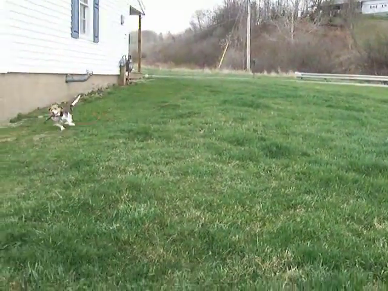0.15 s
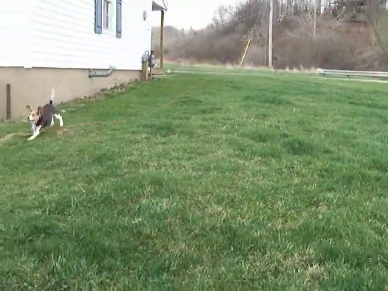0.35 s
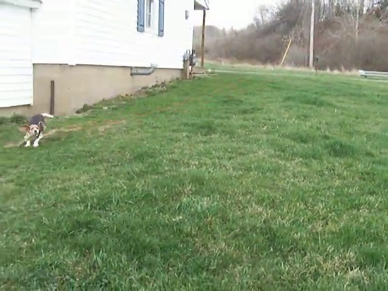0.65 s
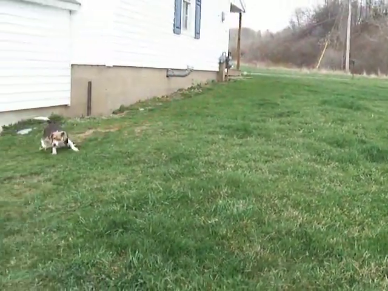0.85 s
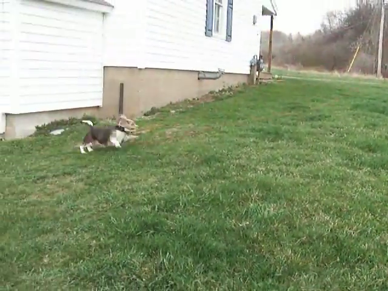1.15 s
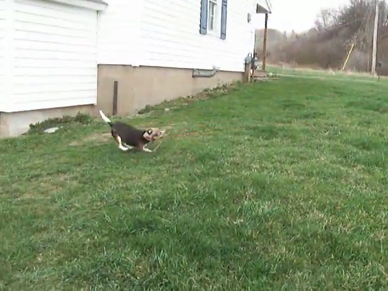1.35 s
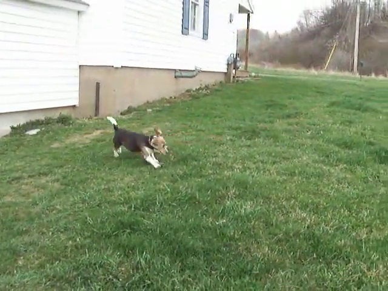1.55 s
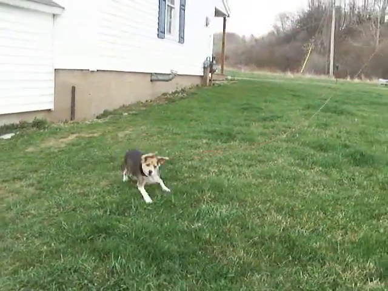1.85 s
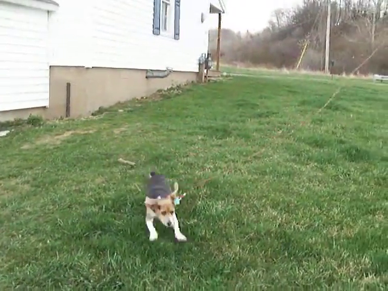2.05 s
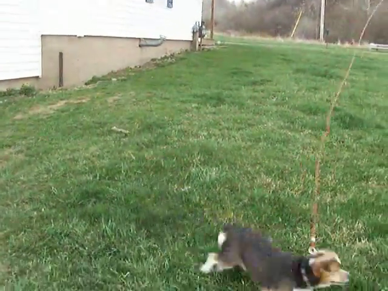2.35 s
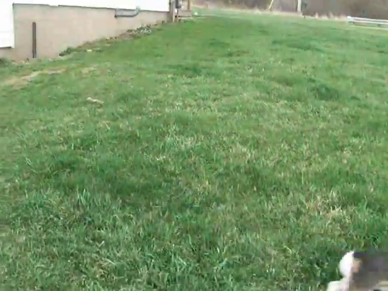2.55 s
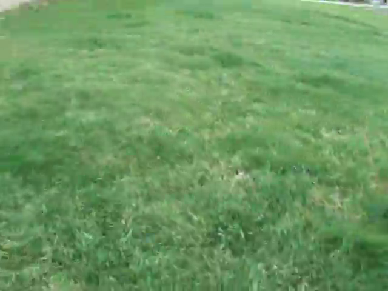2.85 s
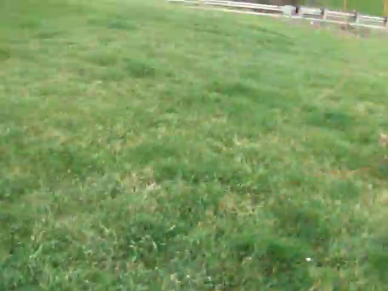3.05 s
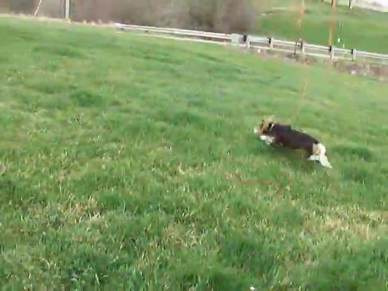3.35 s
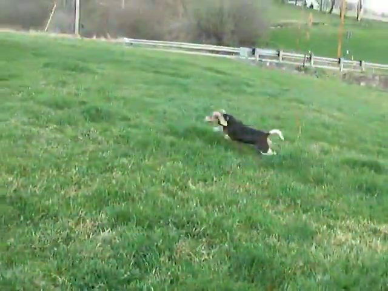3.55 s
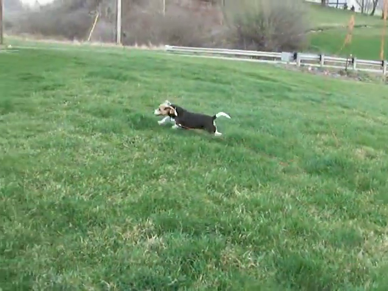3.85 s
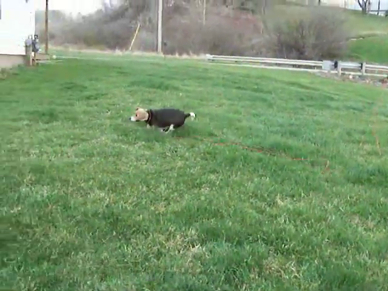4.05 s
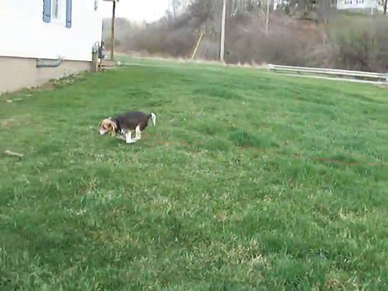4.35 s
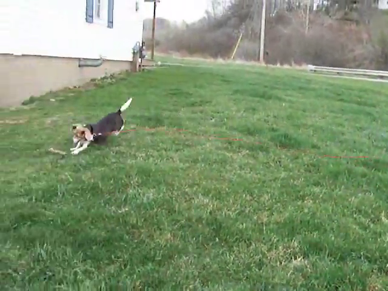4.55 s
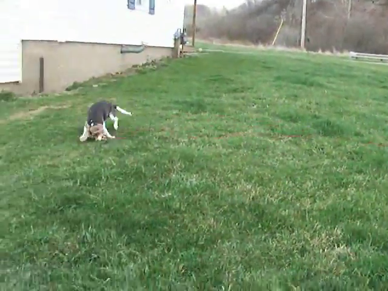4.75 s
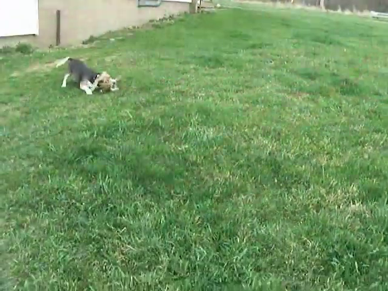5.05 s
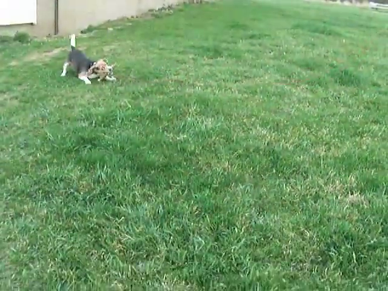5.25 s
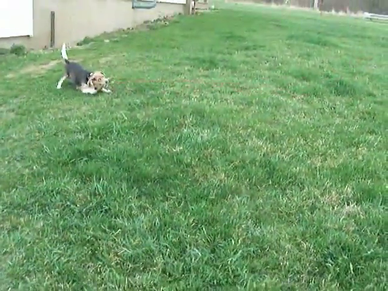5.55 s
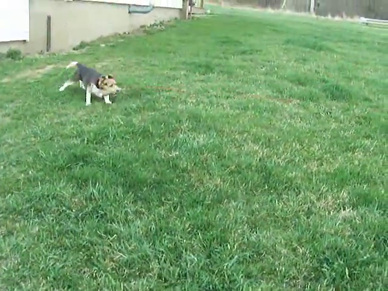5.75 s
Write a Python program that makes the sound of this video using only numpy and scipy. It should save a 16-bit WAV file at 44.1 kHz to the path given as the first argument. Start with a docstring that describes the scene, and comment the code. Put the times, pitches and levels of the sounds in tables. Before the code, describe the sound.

A small dog gallops over a lawn, collar tags jingling and a long tether hissing through grass, with wind thumps and steady hiss behind.

```python
"""Small dog galloping on a long tether

A small dog gallops over a lawn and comes close: paws swish as blades of grass flick at random,
and the dragged line hisses and chatters. Collar tags and a hook ring, links click, the line knocks,
metal squeaks and a short scuff rasps. Wind buffets one port of a hand-held camera whose zoom motor
runs briefly; behind lie a noise hiss (far road, some rustle of the dog) and a bird's gliding notes."""
import sys
import numpy as np
from scipy import signal
from scipy.fft import rfft, irfft
from scipy.io import wavfile

SR = 44100
rng = np.random.default_rng(int(sys.argv[2]) if len(sys.argv) > 2 else 0)


def to_wav(sig):
    """Store sig (one row per channel, or 1-D mono) as 16-bit WAV at the path in sys.argv[1].

    Samples outside -1..1 are clipped; the rate is SR.
    """
    pcm = np.clip(np.atleast_2d(sig), -1, 1) * 32767
    pcm = np.round(pcm).astype(np.int16)
    wavfile.write(sys.argv[1], SR, pcm.T)  # frames by channels


N = 260631
TIME = np.arange(N) / SR   # [s]
BINS = np.fft.rfftfreq(N, 1 / SR)   # [Hz]
# Levels in the tables are relative: the functions that play them add shifts of their own.


def from_db(db):
    """Turn decibels into a gain."""
    return 10 ** (np.asarray(db) / 20)


def rms_one(x):
    """Scale to unit power."""
    return x / np.sqrt(np.mean(x ** 2) + 1e-20)


def in_time(rows):
    """Join the points of a (time, value) curve by straight lines, one value per sample."""
    s, value = np.transpose(rows)
    return np.interp(TIME, s, value)


def at_bins(points):
    """Join the points of a spectrum by straight lines on a log-frequency axis."""
    hz, value = np.transpose(points)
    return np.interp(np.log(BINS + 1), np.log(hz), value)


def panned(balance_db):
    """Left and right gains of unit mean power; a positive balance favours the left."""
    gains = from_db(np.array([balance_db, -balance_db]) / 2)
    return gains / np.sqrt(np.mean(gains ** 2, axis=0))


def drift(rate_hz):
    """Random wandering with spread 1, made by smoothing noise."""
    smoothed = rfft(rng.standard_normal(N)) / (1 + (BINS / rate_hz) ** 2)
    return rms_one(irfft(smoothed, N))


def coloured(x, colour):
    """Give a signal a spectrum, then scale it to unit power."""
    return rms_one(irfft(rfft(x) * from_db(at_bins(colour)), N))


def filtered(x, kind, hz):
    """Second-order Butterworth filter."""
    return signal.sosfilt(signal.butter(2, hz, kind, fs=SR, output="sos"), x)


def swell(s, length):
    """A level that grows to its peak at time s and fades as it came."""
    return np.exp(-np.abs(2 * (TIME - s) / length) ** 1.5)


def held(s, hold_s, attack_s, release_s):
    """A level that rises up to time s, holds, and dies away."""
    rising = np.minimum(TIME - s, 0) / attack_s
    falling = np.maximum(TIME - s - hold_s, 0) / release_s
    return np.exp(rising - falling)


# How the two ports colour the treble differently: (frequency [Hz], left minus right [dB])
PORT_TREBLE = [(1000, 1.5), (2200, -2), (3000, -10.5), (3900, -6.5), (4400, -2.5), (4900, -11), (5400, 2.5),
               (6100, 33), (6600, 1), (7200, 12.5), (8200, 0.5)]


def port_treble(spectrum):
    """Weight a spectrum for each port and return to sound."""
    return irfft(spectrum * panned(at_bins(PORT_TREBLE)), N)


def at_ports(pair, alike_hz, lag_ms):
    """Both ports hear the same bass, partly their own treble; the left one hears it later."""
    mid, side = rfft(pair)
    alike = 1 / (1 + (BINS / alike_hz) ** 2)
    both = np.sqrt(1 + alike) * mid + np.sqrt(1 - alike) * side * [[1], [-1]]
    both[0] *= np.exp(-2j * np.pi * BINS * lag_ms / 1000)
    return port_treble(both)


def blades(per_s, spread_db):
    """Grass blades flick at random, a few much harder than the rest."""
    sizes = from_db(spread_db * np.minimum(rng.exponential(1, (2, N)), 4))
    signs = rng.choice([-1, 1], (2, N))
    return rms_one(sizes * signs * (rng.random((2, N)) < per_s / SR))


def ring(push, hz, t60):
    """A unit click sets a sine of height 1 ringing; it falls by 60 dB in t60 seconds."""
    r, w = from_db(-60 / (t60 * SR)), 2 * np.pi * hz / SR
    return signal.lfilter([0, np.sin(w)], [1, -2 * r * np.cos(w), r * r], push + 1e-18)


def rattle(modes, per_s, spread_db):
    """Random small touches set each tone of a thing ringing; scaled to unit power."""
    tones = [from_db(db) * ring(blades(per_s, spread_db), hz, t60) for hz, db, t60 in modes]
    return rms_one(sum(tones))


def struck(hits, modes, crack_db, crack_s, bounce_db, bounce_s):
    """Each blow grates briefly, rings every mode with a strength of its own and bounces once."""
    s, level_db, balance_db = np.transpose(hits)
    vary_db = 2.8
    gains = from_db(level_db) * panned(balance_db)
    bounce_times = s + bounce_s * rng.uniform(0.98, 1.5, len(s))
    first = np.clip((s * SR).astype(int), 0, N - 1)
    second = np.clip((bounce_times * SR).astype(int), 0, N - 1)
    out, push = np.zeros((2, N)), np.zeros((2, N))
    for hz, mode_db, t60 in modes:
        push[:, first] = gains * from_db(vary_db * rng.uniform(-1.5, 1.5, len(s)))
        push[:, second] = gains * from_db(bounce_db + vary_db * rng.standard_normal(len(s)))
        out += from_db(mode_db) * ring(push, hz, t60)
    push[:, first] = gains   # the bounces stay in and grate as well
    fading = signal.lfilter([1], [1, -np.exp(-1 / (crack_s * SR))], push + 1e-18)
    scrape = fading * rng.standard_normal((2, N))
    out += from_db(crack_db) * filtered(scrape, "band", [5000, 7100])
    out = filtered(out, "high", 2100)   # small things radiate no bass
    return np.array([np.roll(out[0], 2), out[1]])   # the left port lies a little farther away


# Where the dog is, as heard: (time [s], left minus right [dB])
DOG_BEARING = [(0.2, 26), (1.05, 3), (1.9, 7), (2.4, 1), (3.3, 2.5), (4.35, 10), (5.9, 4)]


def placed(hits, shift_db):
    """Add to each blow the left-right balance of the place where the dog is."""
    return [(s, db, np.interp(s, *np.transpose(DOG_BEARING)) + shift_db) for s, db in hits]


# The line dragging through grass, louder as the dog runs closer and faster: (time [s], level [dB])
LINE_RUN = [(0.0, -44.5), (0.36, -43), (1.04, -48), (1.48, -44), (1.63, -35.5), (1.87, -35), (2.21, -26),
            (2.93, -32.5), (3.04, -31.5), (3.67, -36), (4.16, -36), (4.31, -36.5), (4.61, -40),
            (4.74, -32.5), (4.92, -30), (5.1, -41.5), (5.32, -50.5), (5.91, -39)]


def line_level():
    """Level of the dragged line in dB, which the paws follow too."""
    return in_time(LINE_RUN) - 3


def light_touches(count):
    """Chance touches over the whole scene, stronger the closer and faster the dog is."""
    over_line_db, spread_db = 14.5, 9.5
    times = (np.arange(count) + rng.random(count)) / count * TIME[-1]
    chance_db = spread_db * (2 * rng.random(count) - 1)
    levels = np.interp(times, *np.transpose(LINE_RUN)) + over_line_db + chance_db
    return list(zip(times, levels))


# Spells of galloping: (first footfall [s], end [s], stride [s], first footfall [dB],
# last footfall [dB], length of a sweep [s]); the dB count from the level of the dragged line
GALLOP_SPELLS = [(0.324, 0.7, 0.28, 3.5, 6.5, 0.05), (1.154, 1.7, 0.15, 15.5, 0, 0.057),
                 (1.85, 2.7, 0.251, 4.5, -4, 0.045), (3.414, 3.9, 0.32, -9, -2.5, 0.052),
                 (4.236, 4.4, 0.27, 4, 9, 0.1), (4.614, 4.85, 0.19, 2.5, -3.5, 0.08),
                 (5.771, 5.9, 0.25, 8, 8, 0.025)]


def footfalls():
    """One sweep for each stride of every spell of galloping."""
    out = np.zeros(N)
    for first, end, stride, first_db, last_db, sweep_s in GALLOP_SPELLS:
        times = np.arange(first, end, stride)
        for s, db in zip(times, np.linspace(first_db, last_db, len(times))):
            out += from_db(db) * swell(s, sweep_s)
    return out


# Spectrum of the line's hiss: (frequency [Hz], level [dB])
LINE_HISS_COLOUR = [(1500, -38.5), (2400, -20), (2950, -2.5), (3500, -4), (4300, -4.5), (4850, -6),
                    (5500, 3), (6300, 4), (7200, -15.5), (8300, -29)]
# What the running line chatters with: (frequency [Hz], level [dB], time to fall 60 dB [s])
CHATTER_MODES = [(2888, 2.5, 0.028), (3130, -1, 0.033), (3786, -3.5, 0.029), (4800, 6, 0.043),
                 (6230, -16, 0.024), (5870, -17, 0.015)]
# The line is pulled tight and chatters harder: (time of the middle [s], length [s], extra level [dB])
LINE_TUGS = [(2.297, 0.38, 5), (3.076, 0.72, 12)]


def dragged_line():
    """The line hisses over the grass blades and chatters when it runs fast; the tags tremble with it."""
    stride_pull = 0.4   # how strongly each stride jerks the line on and swells its sound
    line_db = line_level()
    hiss = from_db(1) * coloured(blades(4000, 4.9), LINE_HISS_COLOUR)
    speed = np.clip((line_db + 40.5) / 12, .1, 1)
    taut = speed * from_db(sum(db * swell(s, length) for s, length, db in LINE_TUGS))
    chatter = taut * filtered(rattle(CHATTER_MODES, per_s=220, spread_db=3.0), "high", 2400)
    tremble = from_db(-10) * rattle(LARGE_TAG_MODES + SMALL_TAG_MODES, per_s=20, spread_db=4.0)
    level = from_db(line_db + 2 + 3.6 * drift(23)) * (1 + stride_pull * footfalls())
    return at_ports(level * (hiss + chatter + tremble), alike_hz=6800, lag_ms=0.067)


# Loudness of the background hiss: (time [s], level [dB])
BACKGROUND_LEVEL = [(0.0, -53), (0.95, -56.5), (2.22, -45), (2.5, -50.5), (3.19, -53), (5.91, -44.5)]
# Spectrum of the background hiss: (frequency [Hz], level [dB])
BACKGROUND_COLOUR = [(60, 11), (150, 3.5), (350, 1.5), (600, -2.5), (950, 2), (1500, -4), (2500, -2.5),
                     (3200, -0.5), (4000, -6), (4900, 2), (6200, -1), (7200, -24.5), (8300, -30.5)]


def background_hiss():
    """The background hiss, far road and some rustle of the dog, is coloured noise whose level moves."""
    hiss = coloured(rng.standard_normal((2, N)), BACKGROUND_COLOUR)
    return at_ports(from_db(in_time(BACKGROUND_LEVEL) + 5.5) * hiss, alike_hz=1400, lag_ms=0.011)


# Low thuds of the wind: (time [s], level [dB])
WIND_THUDS = [(0.139, -22.5), (0.429, -11), (1.207, -13), (1.397, -7), (1.684, -16), (2.217, -18.5),
              (2.362, -12.5), (2.475, -11)]


def airflow(gusts):
    """Level in dB of the breeze, of gusts that rise, hold and die, and of the rush round each thud."""
    breeze_db, attack_s, release_s = -40.5, 0.046, .05
    rush_db, rush_s = -12, 0.079   # level against the thud, and length
    blowing = sum(from_db(db) * held(s, hold, attack_s, release_s) for s, hold, db in gusts)
    rushes = sum(from_db(db + rush_db) * swell(s, rush_s) for s, db in WIND_THUDS)
    return 10 * np.log10(from_db(breeze_db) ** 2 + blowing ** 2 + rushes ** 2)


# Gusts on the right port: (time when fully risen [s], hold [s], level [dB], extra level of eddies [dB])
GUSTS = [(0.14, 0.72, -30.5, -2.5), (1.172, 0.74, -24.5, 5.5), (2.237, 0.2, -24.5, 4),
         (4.793, 0.027, -34, 3.5)]
# Spectrum of the wind's rumble: (frequency [Hz], level [dB])
RUMBLE_COLOUR = [(15, -1), (30, 2), (55, 3), (110, -8), (200, -26), (400, -43.5), (900, -47.5), (2000, -60)]


def wind():
    """Gusts buffet the right port in lumps; the sheltered left one follows them only weakly."""
    gust_db = airflow([(s, hold, db) for s, hold, db, _ in GUSTS])
    eddy_db = airflow([(s, hold, db + extra_db) for s, hold, db, extra_db in GUSTS])
    level_db = np.array([-40.5 + 0.38 * (gust_db + 46.0), gust_db + 7.5])   # left, right
    noise = coloured(rng.standard_normal((2, N)), RUMBLE_COLOUR)
    rumble = from_db(level_db + 2.0 * drift(18)) * noise
    # strong gusts also shed small eddies, which flutter higher up
    eddy_colour = [(70, -12.0), (160, 8.5), (320, -8), (600, -29.5), (1500, -53.0)]   # (Hz, dB)
    eddies = coloured(rng.standard_normal(N), eddy_colour)
    eddy_level = from_db(-34.5 + 1.11 * (eddy_db + 17.0) + 7.7 * drift(7.8))
    return rumble + panned(-25)[:, None] * eddy_level * eddies


TAG_GRATE_S = .004   # how fast a struck tag's grating dies away

# Blows on the small tag: (time [s], level [dB])
SMALL_TAG_BLOWS = [(0.0586, -20), (1.1872, -21.5), (1.29, -25.5), (1.958, -15.5), (2.0441, -11),
                   (3.4421, -16), (3.5612, -16), (4.1126, -16.5), (4.14, -14.5), (4.3414, -12),
                   (4.3644, -7.5), (4.554, -5.5), (4.6467, -16.5), (5.8601, -11)]
# What the small tag rings with: (frequency [Hz], level [dB], time to fall 60 dB [s])
SMALL_TAG_MODES = [(4790, -16, .13), (6880, -4, .09), (6970, -8, .13), (8010, -15, .17)]


def small_tag():
    """The small collar tag rings freely in a few high tones."""
    hits = placed(list(SMALL_TAG_BLOWS) + light_touches(count=8), shift_db=-2.5)
    return from_db(-0.5) * struck(hits, SMALL_TAG_MODES, crack_db=5.5, crack_s=TAG_GRATE_S,
                                  bounce_db=-17.5, bounce_s=0.0019)


def thuds():
    """Hard eddies thump the right port: three low tones that die quickly."""
    push = np.zeros((2, N))
    for s, level_db in WIND_THUDS:
        push[:, int(s * SR)] = from_db(level_db) * panned(-36)
    thump = ring(push, 60, 0.11)
    thump -= from_db(2) * ring(push, 124, 0.057)
    thump += from_db(-2.5) * ring(push, 276, 0.015)
    return filtered(thump, "low", 450)


# Dead clicks of the metal links: (time [s], level [dB])
LINK_CLICKS = [(0.183, -13.5), (0.2317, -21.5), (0.2665, -21.5), (0.5979, -19.5), (0.8738, -16),
               (1.4549, -22), (1.466, -19), (1.5181, -10), (1.5854, -14), (1.8741, -4), (2.157, -15),
               (2.4049, -1), (2.9254, -14), (3.1677, -13), (3.222, -19.5), (3.7288, -18), (3.743, -11),
               (3.9848, -6), (4.051, -21), (4.2995, -11.5), (4.3219, -3), (4.6222, -5.5), (4.6344, -6),
               (5.5387, -11), (5.8326, -13.5)]
# What a link rings with: (frequency [Hz], level [dB], time to fall 60 dB [s])
LINK_MODES = [(3300, -19, .006), (4900, -13, .007), (6100, -9, .007), (6850, -8, .01)]


def links():
    """A link grazes its neighbour just before it clicks home; its tones die almost at once."""
    graze_lead_s, graze_db = 0.0098, -13.5
    grazes = [(s - graze_lead_s, db + graze_db) for s, db in LINK_CLICKS]
    hits = placed(list(LINK_CLICKS) + grazes + light_touches(count=12), shift_db=-1)
    return from_db(1.04) * struck(hits, LINK_MODES, crack_db=8.5, crack_s=0.0011,
                                  bounce_db=-10.5, bounce_s=0.0027)


# Spectrum of the paws' swish: (frequency [Hz], level [dB])
PAW_SWISH_COLOUR = [(200, -0.5), (500, -2.5), (1100, -2), (1800, 1), (2400, 2.5), (3200, 7.5), (5000, -4),
                    (7500, -18.5)]


def paws():
    """Paws brush the grass blades aside, one swish of random flicks for each stride."""
    strokes = from_db(line_level()) * footfalls()
    swish = coloured(blades(5000, 3.5), PAW_SWISH_COLOUR)
    return at_ports(strokes * from_db(0.5 + 1.8 * drift(54)) * swish, alike_hz=6800, lag_ms=0.067)


# Spectrum of the zoom motor: (frequency [Hz], level [dB])
ZOOM_MOTOR_COLOUR = [(2300, -27), (2600, -10), (2800, 9.5), (3100, -4.5), (3600, 2.5), (4300, -19),
                     (5200, 6), (5800, -15), (7500, -46.5)]


def zoom_motor():
    """The zoom motor inside the camera runs once: a short stretch of coloured noise."""
    running = held(0.38, 0.587, attack_s=0.027, release_s=0.027)
    return from_db(-36) * running * coloured(rng.standard_normal((2, N)), ZOOM_MOTOR_COLOUR)


# Knocks that run along the taut line: (time [s], level [dB])
LINE_KNOCKS = [(0.8528, -21), (0.8636, -20), (1.0256, -26.5), (1.1, -24.5), (1.808, -20.5), (2.0448, -11.5),
               (2.146, -15.5), (2.2938, -8), (2.9907, -15.5), (3.0424, -20), (3.0708, -19), (3.0968, -14),
               (3.1248, -12.5), (3.1812, -12.5), (3.2205, -19.5), (3.557, -21.5), (4.4416, -20)]
# What the knocked line rings with: (frequency [Hz], level [dB], time to fall 60 dB [s])
KNOCK_MODES = [(2958, -5, 0.042), (3130, -4.5, 0.036), (3850, -54, .012)]


def line_knocks():
    """The taut line knocks at a pitch that the right port favours."""
    hits = [(s, db, -13.5) for s, db in LINE_KNOCKS]
    return from_db(3) * struck(hits, KNOCK_MODES, crack_db=-14, crack_s=0.001,
                               bounce_db=-11, bounce_s=0.002563)


# Blows on the large tag: (time [s], level [dB])
LARGE_TAG_BLOWS = [(1.0123, -25), (1.0525, -9), (1.5164, -13), (1.602, -12), (1.6159, -12), (1.8382, -10),
                   (2.0008, -2.5), (2.0098, -8.5), (2.11, -18), (2.832, -12.5), (3.0111, -9), (3.0277, -12),
                   (3.25, -8), (3.3842, -9), (3.9584, -15), (4.0094, -9.5)]
# What the large tag rings with: (frequency [Hz], level [dB], time to fall 60 dB [s])
LARGE_TAG_MODES = [(3980, -16, .12), (4720, -8, .075), (6290, -8, .07), (6420, -10, .11), (7080, -9, .09)]


def large_tag():
    """The large collar tag rings freely, somewhat lower than the small one."""
    hits = placed(list(LARGE_TAG_BLOWS) + light_touches(count=6), shift_db=-3.0)
    return from_db(-2.5) * struck(hits, LARGE_TAG_MODES, crack_db=0, crack_s=TAG_GRATE_S,
                                  bounce_db=-5.5, bounce_s=0.0074)


def whistle(note, waver, arch):
    """One gliding tone that swells and fades, and whose pitch trembles."""
    s, length, start_hz, end_hz, level_db = note
    part = np.clip((TIME - s) / length, 0, 1)
    bow = 4 * part * (1 - part)   # 0 at both ends, 1 in the middle
    hz = (start_hz + (end_hz - start_hz) * part) * (1 + arch * bow)
    phase = 2 * np.pi * np.cumsum(hz * (1 + waver)) / SR
    return np.sqrt(2) * from_db(level_db) * bow * np.sin(phase)


# The bird's arched notes: (start [s], length [s], start pitch [Hz], end pitch [Hz], level [dB],
# share by which the pitch rises in mid-note [1])
BIRD_NOTES = [(1.207, 0.074, 5180, 4740, -42, 0.075), (1.741, 0.07, 5270, 4800, -46, .05),
              (5.369, 0.044, 4130, 3390, -38.5, 0.25), (5.412, 0.045, 3110, 4000, -47.5, -0.011)]


def bird():
    """The distant bird's clean gliding notes flutter faintly."""
    waver, flutter = .005 * drift(300), from_db(3.5 * drift(70))
    notes = sum(whistle(note, waver, arch) for *note, arch in BIRD_NOTES)
    return port_treble(rfft(from_db(4.5) * flutter * notes))


# Squeaking tones of the tether: (start [s], length [s], start pitch [Hz], end pitch [Hz], level [dB])
SQUEAK_TONES = [(2.388, 0.025, 4800, 5250, -10), (3.166, 0.02, 4700, 4750, -18),
                (4.82, 0.11, 3130, 3250, -26), (4.815, 0.08, 4640, 4590, -30), (4.81, 0.1, 6330, 6290, -31),
                (4.92, 0.035, 1600, 1630, -42), (4.935, 0.04, 3200, 3700, -32),
                (5.0, 0.045, 4660, 4770, -28), (5.002, 0.05, 7300, 7650, -35)]


def squeaks():
    """Rubbing metal squeaks: gliding tones, rough in pitch and stuttering in level."""
    waver, stutter = .008 * drift(400), from_db(3 * drift(150))
    tones = sum(whistle(note, waver, arch=0) for note in SQUEAK_TONES)
    return port_treble(rfft(from_db(0.5) * stutter * tones))


# Blows on the snap hook: (time [s], level [dB])
HOOK_BLOWS = [(4.3338, -1.5), (5.7891, -15)]
# What the hook rings with: (frequency [Hz], level [dB], time to fall 60 dB [s])
HOOK_MODES = [(2562, -11, .09), (5620, -6, .085), (5814, -6, .1), (6950, -10, .1)]


def snap_hook():
    """The snap hook rings freely, its lowest tone below those of the tags."""
    return from_db(-1.0) * struck(placed(HOOK_BLOWS, shift_db=15), HOOK_MODES, crack_db=-9,
                                  crack_s=0.0072, bounce_db=-13.5, bounce_s=.004)


# The catches of a rasping scuff: (time of the middle [s], level [dB], length [s])
SCUFF_CATCHES = [(5.557, -17.5, 0.022), (5.588, -17.5, 0.033), (5.623, -15.5, 0.042)]
# Spectrum of the scuff: (frequency [Hz], level [dB])
SCUFF_RASP_COLOUR = [(150, -14), (600, -20.5), (1100, -21.5), (1450, -9), (1900, 1.5), (2300, -8),
                     (3100, 5), (4300, -10.5), (5900, -2.5), (7000, -13.5), (8200, -36)]


def scuff():
    """A short coarse rasp of random flicks that catches and slips."""
    catches = sum(from_db(db) * swell(s, length) for s, db, length in SCUFF_CATCHES)
    rasp = from_db(2.0 * drift(140)) * coloured(blades(7000, 2.0), SCUFF_RASP_COLOUR)
    return at_ports(catches * rasp, alike_hz=7000, lag_ms=0.059)


def scene():
    """All that sounds on and around the lawn."""
    ground = dragged_line() + paws() + scuff()
    metal = small_tag() + large_tag() + links() + snap_hook() + squeaks()
    surroundings = background_hiss() + wind() + thuds() + zoom_motor() + bird()
    return ground + metal + line_knocks() + surroundings


def record(dry):
    """The treble is cut steeply above 8400 Hz and the highest peaks clip."""
    steep = signal.ellip(10, .3, 90, 8400, fs=SR, output="sos")
    return np.clip(signal.sosfilt(steep, dry), -1, 1)


dry = scene()
out = record(dry)
to_wav(out)
```